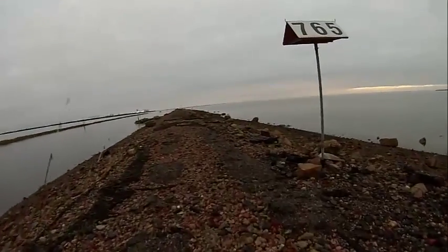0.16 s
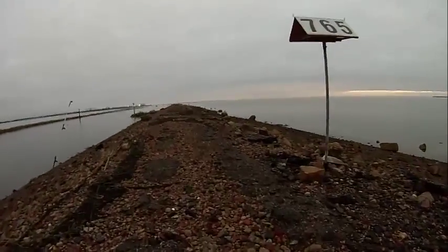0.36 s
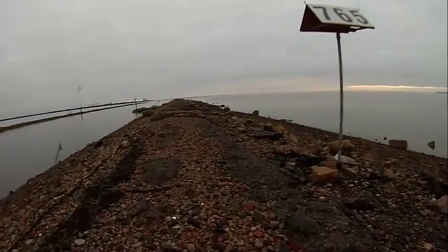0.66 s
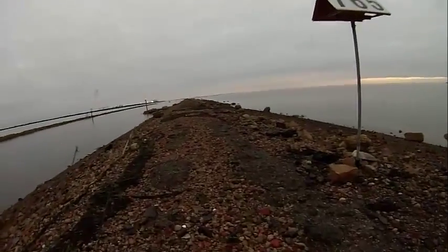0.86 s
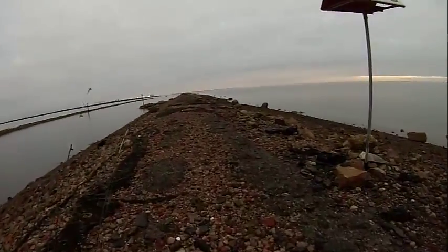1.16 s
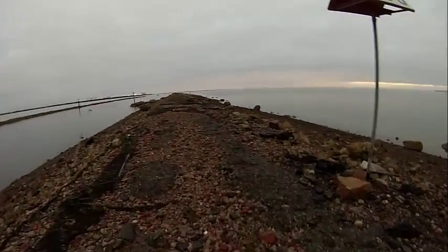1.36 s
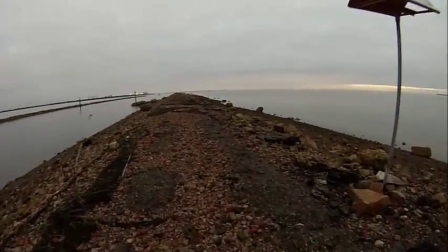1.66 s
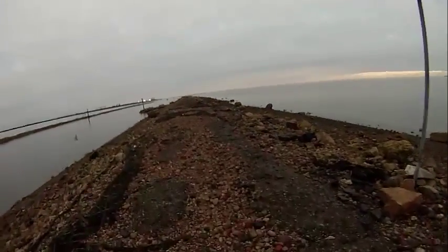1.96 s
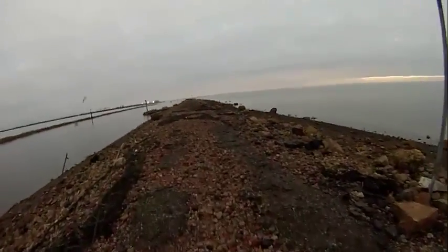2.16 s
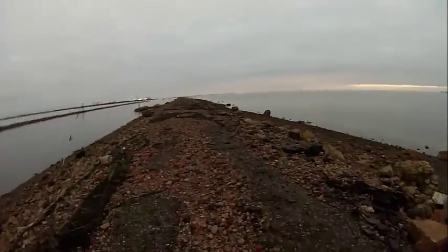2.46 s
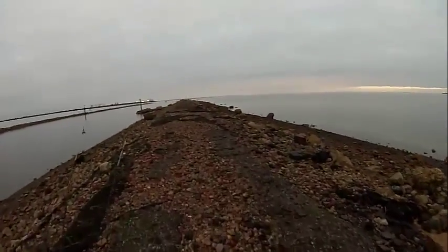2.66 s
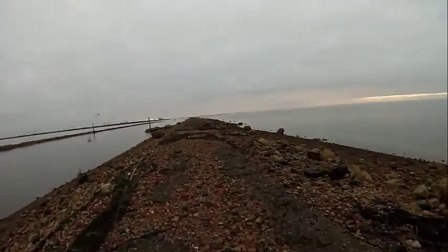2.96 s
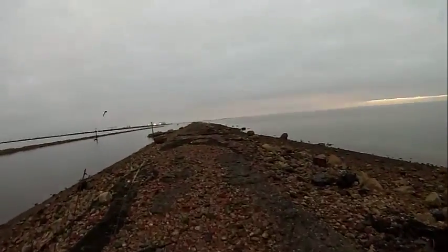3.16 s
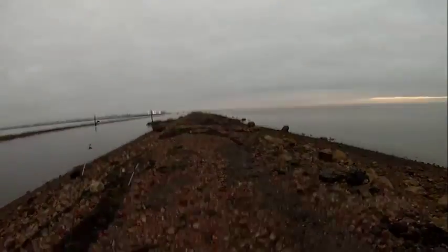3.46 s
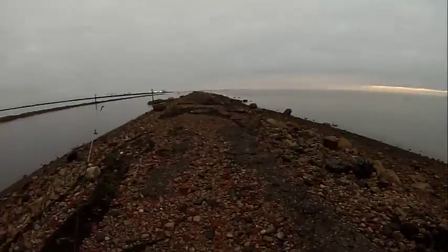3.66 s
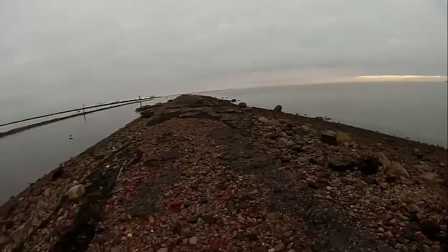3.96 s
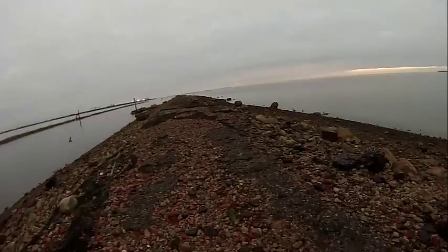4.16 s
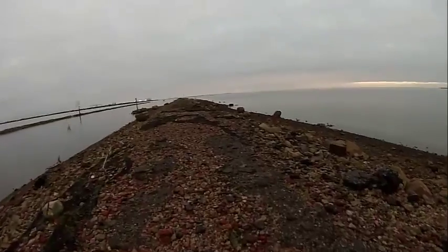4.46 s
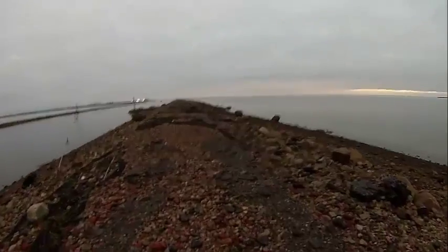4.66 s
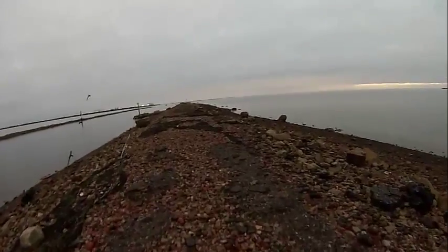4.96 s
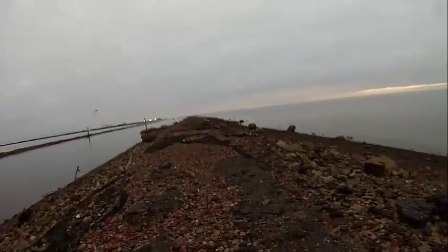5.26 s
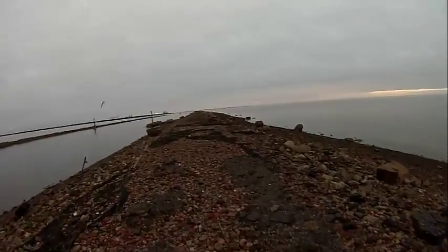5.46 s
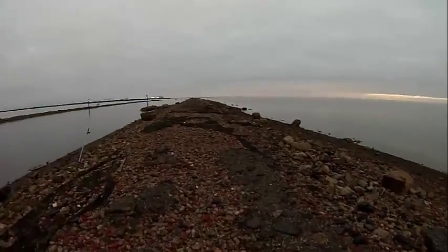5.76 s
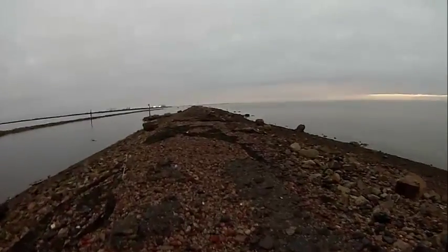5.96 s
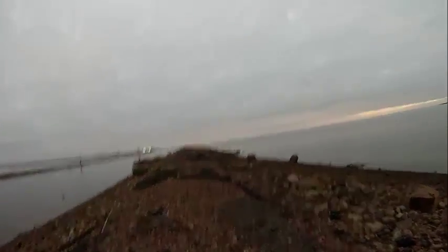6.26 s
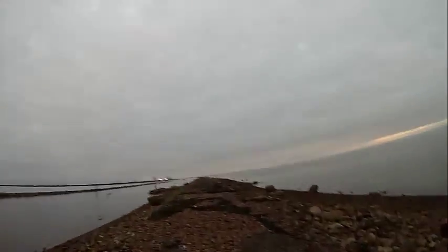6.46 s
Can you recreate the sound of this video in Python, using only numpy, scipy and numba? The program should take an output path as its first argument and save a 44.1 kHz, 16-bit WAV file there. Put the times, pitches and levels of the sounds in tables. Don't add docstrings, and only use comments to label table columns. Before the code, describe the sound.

One person walks over gravel on a calm grey shore, carrying a small sealed camera. About every half second a heel strike shakes the housing into a deep, short thump, with a dull knock and a faint, muffled crunch of stones. Between steps come low body rumble, a slight grip shuffle, tiny scuffs and soft air hiss. Hard jolts add small ticks.

```python
import sys
import numpy as np
from scipy import signal
from scipy.fft import rfft, irfft
from scipy.io import wavfile
from scipy.ndimage import uniform_filter1d
from numba import njit

SR = 44100
rng = np.random.default_rng(int(sys.argv[2]) if len(sys.argv) > 2 else 0)


def gain_from_db(level_db):
    decades = np.asarray(level_db, float) / 20
    return 10 ** decades


def waveform_to_disk(signal):
    frames = np.transpose(np.atleast_2d(signal))
    scaled = np.clip(frames, -1, 1) * 32767
    samples = np.round(scaled).astype(np.int16)
    wavfile.write(sys.argv[1], SR, samples)


N = 290927

# start in [s], size in [dB], rocking in [Hz], decay in [ms].
HEEL_STRIKES = [(0.2649, -10.2, 31.8, 12.6), (0.8006, -13.6, 38.3, 30), (0.8357, -11.5, 26.2, 32),
                (1.3674, -5.6, 30, 33), (1.9162, -17, 19, 38), (1.9322, -11.4, 33.3, 22.4),
                (2.4473, -7, 26.3, 42), (3.0153, -11.6, 27.9, 28), (3.5436, -3.9, 27.3, 35),
                (4.0523, -14.7, 40.4, 67), (4.0937, -11.3, 34.6, 28), (4.6359, -5.5, 33.6, 47),
                (5.2257, -3.8, 32, 32), (5.7198, -6.3, 30.8, 43), (6.2947, -17.8, 19.1, 45.6),
                (6.3108, -15.6, 40.2, 14.9)]


def level(x, db):
    return x * gain_from_db(db) / np.sqrt(np.mean(x ** 2))


def on_log_hz(table, hz):
    table_hz, table_db = np.transpose(table)
    return np.interp(np.log(np.maximum(hz, 1)), np.log(table_hz), table_db)


def coloured(*tables):
    hz = np.arange(N // 2 + 1) * SR / N
    spectrum_db = sum(on_log_hz(table, hz) for table in tables)
    return irfft(rfft(rng.standard_normal(N)) * gain_from_db(spectrum_db), N)


def resonate(x, modes):
    out = 0
    for hz, width_hz, db in modes:
        b, a = signal.iirpeak(hz, hz / width_hz, fs=SR)
        once = signal.lfilter(b, a, x)
        out = out + gain_from_db(db) * signal.lfilter(b, a, once)
    return out


def walk(per_s):
    hold = int(SR / per_s)
    steps = np.repeat(rng.standard_normal(N // hold + 1), hold)
    return 1.25 * uniform_filter1d(steps, hold)[:N]


def grains(per_s, scatter_db):
    when, how_large, sign = rng.random((3, N))
    size = gain_from_db(-scatter_db * np.log(1 - how_large)) * np.sign(sign - .5)
    return level((when < per_s / SR) * size, 0)


def add(out, start_s, wave):
    i = int(start_s * SR)
    out[i:i + len(wave)] += wave[:N - i]


def jolts():
    # start in [s], size in [dB], rocking in [Hz].
    braces = [
        (2.4209, -18.5, 45.8),
        (2.9782, -22.4, 22.5),
        (3.4175, -18.7, 29.3),
        (4.6067, -18.2, 30.7),
        (5.1082, -24.7, 31.0),
        (5.6889, -22.8, 39.6),
        (6.1524, -27.6, 18.1),
        (6.2538, -26.5, 23.9),
    ]
    # start in [s], size in [dB], rocking in [Hz].
    dips = [
        (0.2933, -27.9, 39.8),
        (0.62, -31, 30),
        (0.9306, -26.9, 27.4),
        (1.3321, -21.9, 49.4),
        (1.686, -29.0, 35.1),
        (2.3594, -28.2, 31.1),
        (2.5139, -21.5, 30.0),
        (3.106, -27.3, 18.8),
        (5.3257, -24.9, 30.1),
        (5.8411, -27, 23.1),
    ]
    # start in [s], size in [dB], rocking in [Hz].
    settles = [
        (0.3338, -17.1, 22.5),
        (1.463, -23.7, 25.4),
        (3.6438, -22.5, 24.2),
        (4.1584, -19.4, 17),
        (4.8096, -25, 20.8),
        (6.3693, -27, 31.3),
    ]
    small_decay_ms, small_rise_ms = 31., 7.
    settle_decay_ms, settle_rise_ms = 25., 21.
    lead_ms, slowing_per_s, pointedness = 5., 1.5, .6

    heel_rise_ms, rise_ms_per_db = 4.6, -.33
    swings = [(*row, heel_rise_ms + rise_ms_per_db * row[1], -1) for row in HEEL_STRIKES]
    swings += [(*row, small_decay_ms, small_rise_ms, 1) for row in braces]
    swings += [(*row, small_decay_ms, small_rise_ms, -1) for row in dips]
    swings += [(*row, settle_decay_ms, settle_rise_ms, -1) for row in settles]

    out = np.zeros(N)
    t = np.arange(-4400, 9000) / SR
    for start_s, db, hz, decay_ms, rise_ms, direction in swings:
        build = 1 / (1 + np.exp(-(t * 1000 + lead_ms) / rise_ms))
        fade = np.exp(-(np.maximum(t, 0) * 1000 / decay_ms) ** 1.5)
        swing = np.cos(2 * np.pi * hz * t * (1 - slowing_per_s * np.clip(t, 0, .1)))
        add(out, start_s + t[0], direction * gain_from_db(db) * build * fade * swing)
    return out * (.9 + pointedness * np.abs(out))


def knocks():
    # start in [s], peak in [dB], ring in [Hz].
    mount_knocks = [(.25, -35.5, 95), (0.307, -52, 121), (0.5, -42, 153), (0.848, -55, 122),
                    (1.251, -56, 120), (1.421, -31, 170), (1.759, -51, 202), (1.903, -64, 120),
                    (1.925, -37, 87.5), (2.444, -35, 148.3), (2.489, -57, 122), (2.554, -44.5, 203),
                    (2.841, -53, 174), (3.091, -45.5, 158), (3.5376, -28.5, 297.7), (3.635, -42, 143),
                    (4.095, -54, 135), (4.152, -46, 122), (4.628, -41, 110), (5.222, -39.5, 177),
                    (4.8, -49, 121), (5.081, -47.5, 174), (5.717, -39, 170), (5.758, -37, 122),
                    (6.297, -45, 121), (6.406, -44.5, 123), (6.57, -47.5, 143)]
    trim_db, rise_s, ring_cycles = 3.5, .0035, 5.2
    out = np.zeros(N)
    t = np.arange(6000) / SR
    for start_s, db, hz in mount_knocks:
        fade = gain_from_db(-60 * t * hz / ring_cycles)
        onset = 1 - np.exp(-t / rise_s)
        add(out, start_s, -2 * gain_from_db(db + trim_db) * np.sin(2 * np.pi * hz * t) * fade * onset)
    return out


def gravel(grit_db, shake):
    # start in [s], peak in [dB], brightness in [dB], length in [s].
    crunches = [(0.252, -54.5, -2, 0.046), (0.781, -49, -3, 0.021), (0.816, -52, -2, 0.025),
                (0.86, -52, 1, 0.018), (1.328, -50, -8, 0.0086), (1.338, -48.5, -6, 0.019),
                (1.365, -42.5, -5, 0.0092), (1.381, -45, 3, 0.007), (1.394, -48, -5, 0.0062),
                (1.9, -49, -4, 0.0095), (1.911, -42.5, -6, 0.012), (2.416, -52.5, -7, 0.025),
                (2.4457, -46.5, -9, 0.016), (2.473, -47, 0, 0.013), (3.001, -54, -8.5, 0.02),
                (3.047, -54, -8, 0.024), (3.355, -50, -3, 0.025), (3.522, -48, -1.5, 0.013),
                (3.537, -45, -7.5, 0.0055), (3.558, -41.5, 3, 0.013), (4.0283, -55, -8, 0.0089),
                (4.038, -51.5, -10, 0.016), (4.0515, -39, 2, 0.01), (4.625, -52, -5, 0.0076),
                (4.6335, -35.5, 0.5, 0.0069), (5.202, -42, -2.5, 0.012), (5.217, -52, 6.5, 0.0039),
                (5.7195, -47.5, -9, 0.0057), (5.786, -50.5, 2, 0.029)]
    # start in [s], peak in [dB].
    scuffs = [(0.306, -56), (0.342, -54), (0.512, -58), (0.901, -51.5), (1.118, -51), (1.846, -54.5),
              (2.212, -52.5), (2.275, -57), (2.595, -54), (2.6594, -54), (3.099, -54.5), (3.39, -56),
              (3.778, -53), (4.22, -66), (4.556, -54), (4.764, -50), (4.83, -53), (5.303, -54), (5.86, -56),
              (5.992, -53.5), (6.1265, -65), (6.294, -53), (6.403, -52)]
    # centre in [Hz], width in [Hz], level in [dB].
    low_modes = [(105, 160, 8.5), (267, 590, 3), (633, 1120, -3)]
    body_modes = [(1012, 1160, 14), (1360, 444, 17), (2080, 660, 12), (3013, 1340, -3.5)]
    top_modes = [(3200, 1000, -10), (3990, 590, 3), (5130, 1160, 6.5), (7360, 21000, -6)]
    scuff_bright_db, scuff_s = -.5, .015
    grit_trim_db, burst_trim_db, rattle_db = -4.5, -9., -37.5

    body = gain_from_db(grit_db + grit_trim_db)
    top = np.zeros(N)
    low = gain_from_db(rattle_db) * shake ** 2
    t = np.arange(6000) / SR
    for start_s, db, bright_db, length_s in crunches + [(*row, scuff_bright_db, scuff_s) for row in scuffs]:
        onset = np.minimum(t / .0005, 1)
        fade = np.exp(-(t / max(length_s, .004)) ** 2)
        burst = gain_from_db(db + burst_trim_db) * onset * fade
        add(body, start_s, burst)
        add(top, start_s, burst * gain_from_db(-11.5 + 2.33 * bright_db))
        add(low, start_s, burst * gain_from_db(-2.5 - 1.4 * bright_db))

    stones = grains(per_s=6000., scatter_db=1.6)
    parts = [(low, low_modes), (body, body_modes), (top, top_modes)]
    return sum(envelope * level(resonate(stones, modes), 0) for envelope, modes in parts)


def pebbles():
    # start in [s], peak in [dB], ring in [Hz].
    cracks = [(1.368, -46, 1400), (1.911, -53, 2500), (1.914, -54, 3100), (2.275, -55, 2200),
              (3.541, -52, 5200), (3.538, -43.5, 550), (4.048, -56, 4700), (4.053, -55, 5240),
              (4.634, -48, 1900), (5.72, -45, 940), (5.735, -50, 990)]
    rise_s, t60_s, smooth = .00054, .02, 30
    out = np.zeros(N)
    t = np.arange(2000) / SR
    for start_s, db, hz in cracks:
        flutter = uniform_filter1d(rng.standard_normal(len(t)), smooth) * np.sqrt(smooth)
        envelope = gain_from_db(db - 60 * t / t60_s) * (1 - np.exp(-t / rise_s))
        add(out, start_s, envelope * (1 + .4 * flutter) * np.sin(2 * np.pi * hz * t))
    return out


def body_sway(t):
    # frequency in [Hz], density in [dB per Hz].
    sway_spectrum = [(8, -13), (15, 1.5), (30, 8), (50, -5), (85, -21), (150, -36), (400, -66),
                     (1500, -110)]
    # time in [s], level in [dB].
    sway_levels = [(0.0, -44.5), (0.26, -40.5), (0.62, -44), (1.41, -42), (1.54, -44), (2.52, -41.5),
                   (2.68, -47), (3.42, -41.5), (3.56, -35.5), (3.82, -46), (4.43, -47.5), (4.56, -44.5),
                   (5.29, -41.5), (5.77, -51.5), (5.9, -48.5), (6.12, -46), (6.26, -37.5), (6.6, -47.5)]
    sway_db = np.interp(t, *np.transpose(sway_levels)) + 2.0 * walk(12)
    return gain_from_db(sway_db) * level(coloured(sway_spectrum), 0)


def grip(roll):
    grip_db = -66 + 6 * roll + 1.5 * walk(9.8)
    shuffle = resonate(rng.standard_normal(N), [(95, 81, 2.0), (170, 216, -4.0)])
    return gain_from_db(grip_db - 4.5) * level(shuffle, 0)


def microphone_hiss():
    # frequency in [Hz], density in [dB per Hz].
    hiss_spectrum = [(41, -28), (70, -0.5), (88, -14), (117, -12), (436, -18), (1160, -23), (1490, -24.5),
                     (1950, -24.5), (5550, -33.5), (10800, -42), (12100, -43.5), (13300, -68), (14500, -70)]
    # frequency in [Hz], side over mid in [dB].
    side_spectrum = [(100, -44), (300, -27), (700, -21.5), (1400, -22), (3500, -13.5), (8000, -9.5),
                     (10500, -14.5), (13000, -16)]
    mid = coloured(hiss_spectrum)
    side = coloured(hiss_spectrum, side_spectrum)
    high_pass = signal.butter(2, 200, "high", fs=SR, output="sos")
    scale = gain_from_db(-60.5 + .52 * walk(7.6)) / np.std(signal.sosfilt(high_pass, mid))
    return scale * np.array([mid + side, mid - side])


def scene():
    t = np.arange(N) / SR
    roll_delay_s, roll_spread_s = .1, .15
    rolls = [np.exp(-((t - row[0] - roll_delay_s) / roll_spread_s) ** 2) for row in HEEL_STRIKES]
    roll = np.max(rolls, axis=0)
    heel = jolts()
    shake = np.abs(signal.hilbert(heel))
    grit_db = -69 + 1.5 * roll + .8 * t + 1.5 * walk(6)
    return heel + knocks() + gravel(grit_db, shake) + pebbles() + body_sway(t) + grip(roll) + microphone_hiss()


@njit
def stepped_gain(x, top, lag, step, slow_hz, urge_hz, recover_hz, hold):
    y, gain, clock = np.empty(len(x)), 1., 0.
    for i in range(len(x)):
        over = abs(x[max(i - lag, 0)]) * gain / top - 1
        if over > 0:
            clock = max(clock, hold) + (slow_hz + urge_hz * over) / SR
        elif gain < 1:
            clock -= recover_hz / SR
        if clock >= hold + 1:
            gain, clock = gain / step, hold
        elif clock <= -1:
            gain, clock = min(gain * step, 1.), 0.
        y[i] = x[i] * gain
    return y


def band_limit(x):
    return signal.sosfilt(signal.butter(12, 14780, fs=SR, output="sos"), x)


def record(dry):
    lag_s, step_db = .0016, .46
    held = [stepped_gain(x, gain_from_db(top_db), int(lag_s * SR), gain_from_db(step_db),
                         slow_hz=900., urge_hz=3500., recover_hz=170., hold=3.)
            for x, top_db in zip(dry, (-10.7, -10.95))]
    high_pass = signal.butter(1, 3, "high", fs=SR, output="sos")
    low_pass = signal.butter(8, 11800, fs=SR, output="sos")
    dull = signal.sosfilt(low_pass, signal.sosfilt(high_pass, held))
    hiss = level(coloured([(10000, -30), (11900, 0), (14500, -7), (15500, -40)]), -85)
    return band_limit(dull + hiss * gain_from_db(2.0 * walk(20)))


dry = scene()
out = record(dry)
waveform_to_disk(out)
```